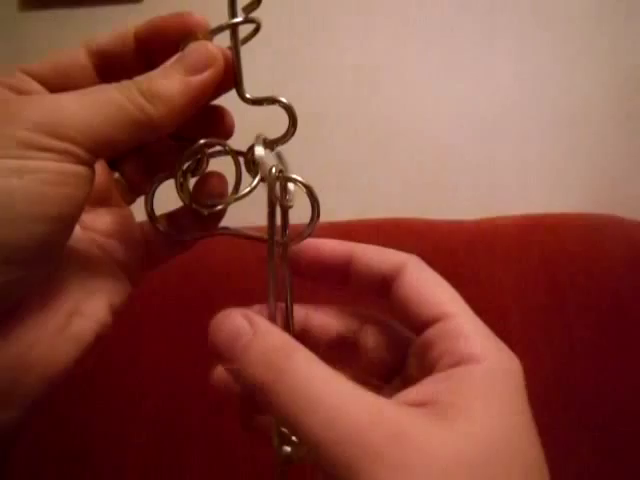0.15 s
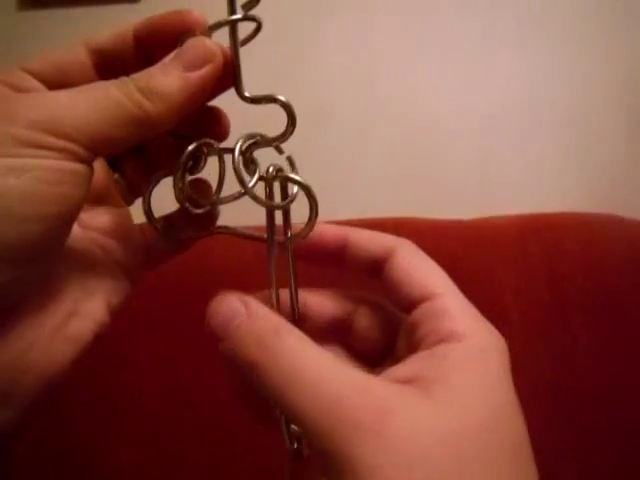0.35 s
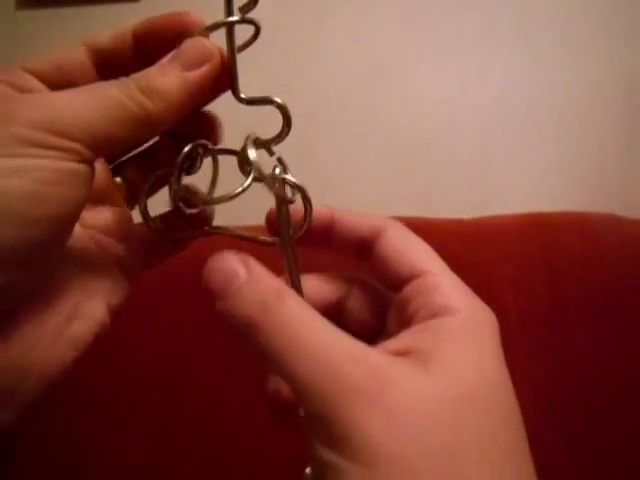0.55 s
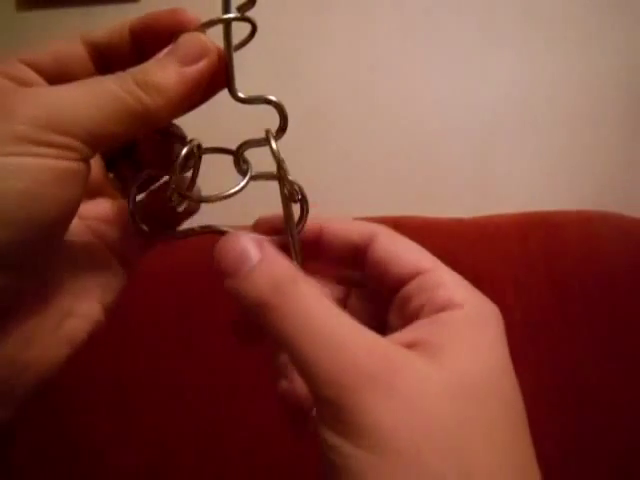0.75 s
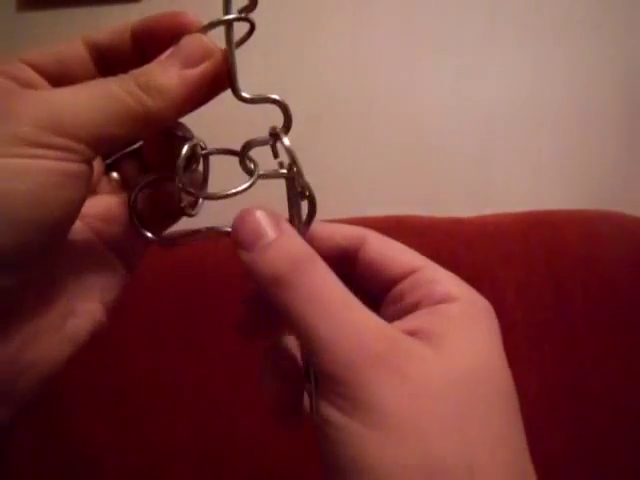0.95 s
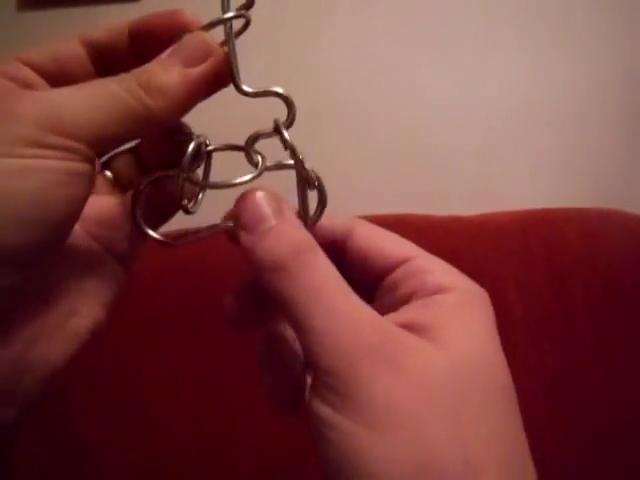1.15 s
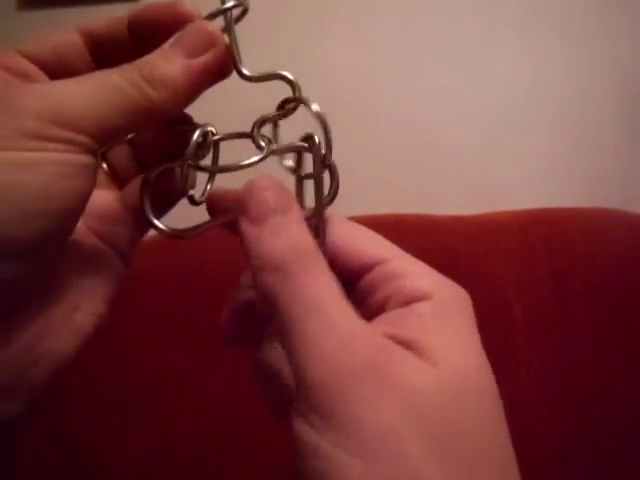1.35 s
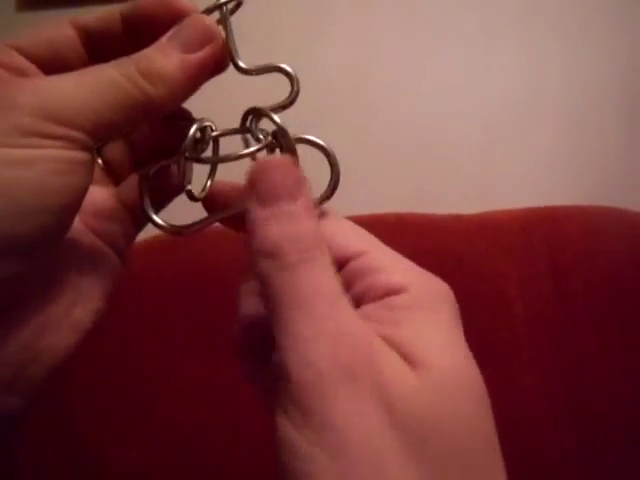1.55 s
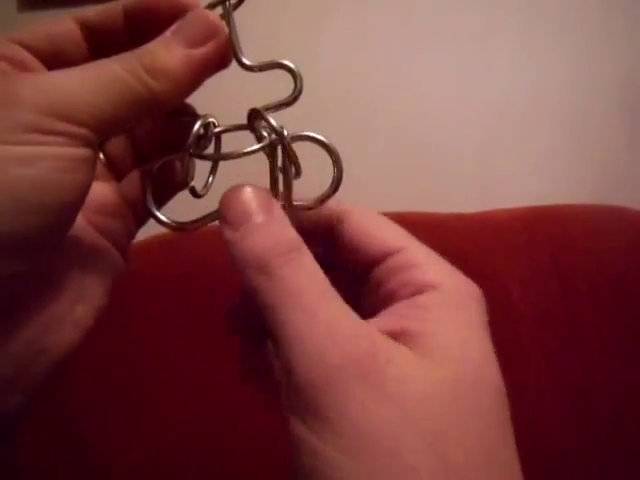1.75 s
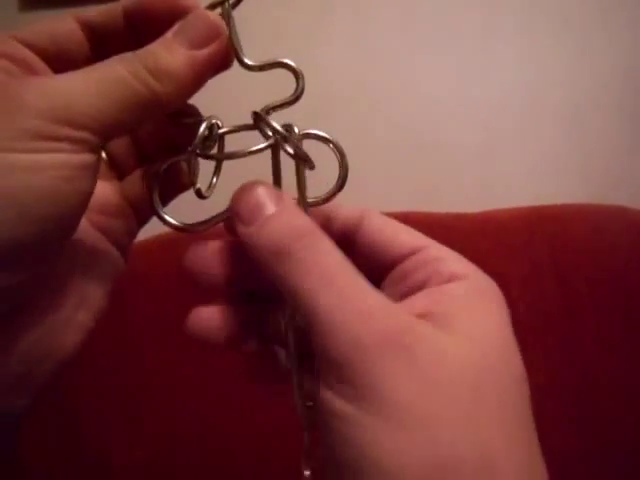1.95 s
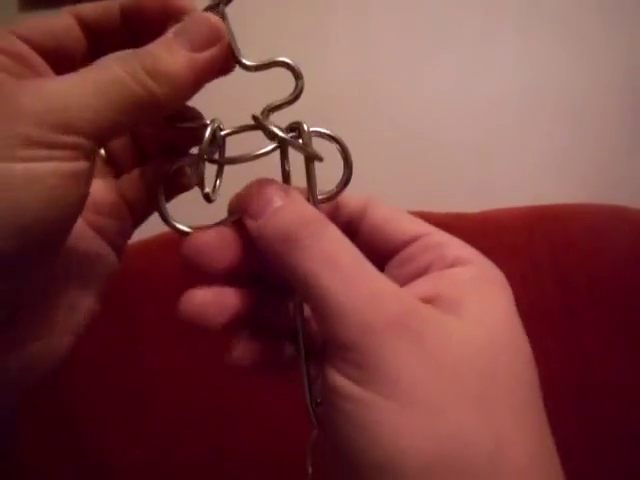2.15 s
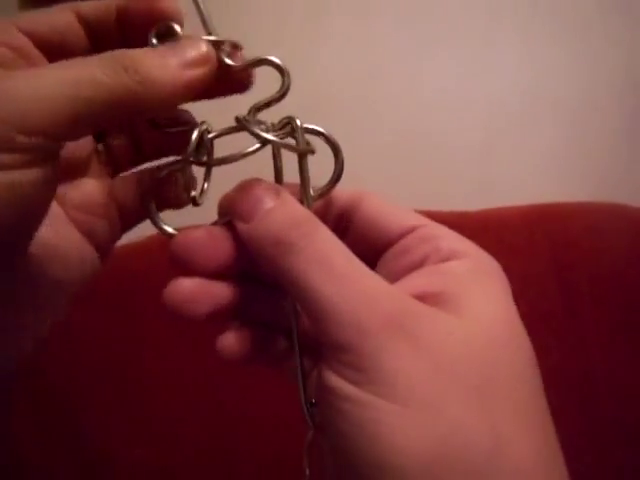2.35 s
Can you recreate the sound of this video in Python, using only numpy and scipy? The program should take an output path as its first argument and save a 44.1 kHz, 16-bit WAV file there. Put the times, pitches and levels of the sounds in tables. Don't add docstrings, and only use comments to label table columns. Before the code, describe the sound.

A small steel wire puzzle clinks and jingles close to the microphone. Light ticks begin around 0.1 seconds, brighter clinks follow at 0.2 and 0.4, and a dense loud rattle peaks around 0.75. Apart from one tick at 1.0, it rests until 1.35. A looser rattle peaks near 1.65, with scattered scrapy clicks around 2.0 and 2.2. Quiet room, faint short echo, fluctuating hiss.

```python
import sys
import numpy as np
from scipy import signal
from scipy.fft import rfft, irfft, next_fast_len
from scipy.io import wavfile
from scipy.ndimage import uniform_filter1d

SR = 44100
rng = np.random.default_rng(int(sys.argv[2]) if len(sys.argv) > 2 else 0)


def master_out(mix):
    frames = np.transpose(np.atleast_2d(mix))
    ceiling = np.clip(frames, -1, 1)
    pcm = np.round(ceiling * 32767).astype(np.int16)
    wavfile.write(sys.argv[1], SR, pcm)


def ratio_of_db(decibels):
    return 10 ** (np.asarray(decibels, float) / 20)


N = 105840

# f/Hz, left over right/dB
LEAN = [(3000, -2.34), (6000, 2.5), (9000, -2), (13000, -11.5)]
SIDE = np.array([[.5], [-.5]])


def unit(x):
    return x / np.sqrt(np.mean(x ** 2) + 1e-20)


def along(points, hz):
    f, v = np.transpose(points)
    return np.interp(np.log(hz + 1), np.log(f + 1), v)


def filtered(x, response):
    m = next_fast_len(x.shape[-1] + 4096)
    spectrum = rfft(x, m) * response(np.fft.rfftfreq(m, 1 / SR))
    return irfft(spectrum, m)[..., :x.shape[-1]]


def hiss():
    # t/s, hiss level/dB
    ride = [(0, -59.5), (.23, -56), (.4, -51), (.57, -49.5), (.74, -48.5), (0.841, -55.5), (1.3, -57),
            (1.44, -53.5), (1.62, -49.5), (1.96, -51.5), (2.4, -50)]
    # f/Hz, density/dB per Hz
    colour = [(20, -3.5), (180, -11), (400, -12), (750, -15.5), (2600, -20), (8000, -24.5), (14280, -25.5),
              (14420, -100)]
    # f/Hz, correlation
    alike = [(60, 0.66), (240, 0.332), (940, 0.234), (3700, 0.085), (14600, 0)]
    level_db = 5.5

    def mid_side(hz):
        angle = np.arccos(np.clip(along(alike, hz), -1, 1)) / 2
        return ratio_of_db(along(colour, hz)) * [np.cos(angle), np.sin(angle)]

    mid, side = filtered(rng.standard_normal((2, N)), mid_side)
    s, db = np.transpose(ride)
    ride_db = np.interp(np.arange(N) / SR, s, db)
    balance_db = np.array([[-.4], [.4]])
    return unit(np.array([mid + side, mid - side])) * ratio_of_db(level_db + ride_db + balance_db)


def room(x):
    # f/Hz, t60/s
    decay = [(2000, 0.3), (6000, 0.201), (13000, 0.169)]
    hz, t, z = signal.stft(rng.standard_normal((2, SR // 3)), SR, nperseg=256)
    z = z * ratio_of_db(-60 * t / along(decay, hz)[:, None])
    tail = signal.istft(z, SR, nperseg=256)[1]
    late = np.pad(x, ((0, 0), (200, 0)))
    return signal.fftconvolve(late, tail / np.linalg.norm(tail[0]), axes=1)[:, :N]


def ports(hz, chance):
    scatter_db, lag_scatter_rad = -0.5, 0.846
    lean_db = along(LEAN, hz) + scatter_db * chance[0]
    return ratio_of_db(SIDE * lean_db), SIDE * lag_scatter_rad * chance[1]


def singing():
    # t/s, level/dB, f/Hz, length before damping/s
    sings = [(0.098, -51.0, 9050.0, 0.025), (0.127, -51.0, 9860.0, 0.012), (0.185, -39.0, 6020.0, 0.012),
             (0.182, -37.0, 11290.0, 0.016), (0.235, -44.0, 9890.0, 0.012), (0.4015, -31.0, 9010.0, 0.045),
             (0.4015, -36.0, 13100.0, 0.015), (0.4575, -28.0, 9020.0, 0.068), (0.458, -42.0, 5220.0, 0.008),
             (0.481, -36.0, 13080.0, 0.03), (0.483, -44.0, 10530.0, 0.04), (0.483, -42.0, 11290.0, 0.055),
             (0.595, -41.0, 10540.0, 0.012), (0.64, -32.0, 4870.0, 0.02), (0.64, -35.0, 6500.0, 0.025),
             (0.645, -24.0, 11290.0, 0.018), (0.701, -26.0, 10500.0, 0.048), (0.701, -24.0, 11270.0, 0.035),
             (0.701, -26.0, 12410.0, 0.026), (0.706, -44.0, 2190.0, 0.012), (0.735, -26.0, 13050.0, 0.04),
             (0.752, -31.0, 9060.0, 0.015), (1.003, -43.0, 13630.0, 0.01), (1.41, -44.0, 10510.0, 0.05),
             (1.415, -46.0, 12410.0, 0.043), (1.428, -45.0, 8660.0, 0.022), (1.5, -56.0, 11260.0, 0.02),
             (1.589, -42.0, 9010.0, 0.025), (1.614, -36.0, 9030.0, 0.028), (2.045, -47.0, 13140.0, 0.006),
             (0.2, -42, 9800, 0.012), (0.2, -37, 11290, 0.014), (0.227, -37, 11300, 0.008),
             (0.227, -39, 13900, 0.005), (0.2905, -38, 12500, 0.005), (0.2905, -40, 9900, 0.005),
             (0.291, -47, 5000, 0.004), (0.312, -54, 9050, 0.014), (0.402, -40, 10520, 0.015),
             (0.483, -41, 13600, 0.03), (0.645, -39, 7700, 0.018), (0.701, -38, 6590, 0.04),
             (0.703, -41, 7630, 0.08), (0.701, -51, 3770, 0.04), (0.766, -36, 6560, 0.025),
             (0.768, -39, 5260, 0.018), (0.82, -47, 11280, 0.02), (0.81, -53, 13600, 0.035),
             (1.97, -40, 11300, 0.015), (2.028, -49, 9900, 0.01)]
    free_t60_s, damped_t60_s, rise_s = .25, .03, 0.000206
    beat_hz, beat_depth, level_db = 90, .35, 1.5
    out = np.zeros((2, N + SR))
    t = np.arange(SR // 5) / SR
    for s, db, hz, length in sings:
        chance = rng.standard_normal((4, 1))
        gain, lag = ports(hz, 0.38 * chance)
        fall_db = -60 * (t / free_t60_s + np.maximum(t - length, 0) / damped_t60_s)
        beat_phase = 2 * np.pi * beat_hz * (1 + 0.155 * chance[2]) * t + 3 * chance[3]
        beat = 1 + beat_depth * np.sin(beat_phase)
        tone = np.sin(2 * np.pi * hz * t + lag) * (1 - np.exp(-t / rise_s))
        start = round(s * SR)
        out[:, start:start + len(t)] += gain * ratio_of_db(db + level_db + fall_db) * beat * tone
    return out[:, :N]


def strike(modes, t60, extra_db, t):
    detune, mode_scatter_db = .002, 3
    hz, db = np.transpose(modes)
    chance = rng.standard_normal((4, len(hz)))
    gain, lag = ports(hz, chance)
    pitch = hz * (1 + detune * chance[3])
    swing = np.sin(2 * np.pi * pitch[:, None] * t + lag[..., None])
    size = gain * ratio_of_db(db + extra_db + mode_scatter_db * chance[2])
    rise = 1 - np.exp(-t * SR / 4)
    return (size[..., None] * swing).sum(1) * ratio_of_db(-60 * t / t60) * rise


def touches(length, samples):
    per_s, chatter_db, scatter_db, fade_db = 2200, -10, 3, -4
    gap, size = rng.exponential(size=(2, 120))
    when = (np.cumsum(gap) - gap[0]) / per_s
    force = ratio_of_db(chatter_db + scatter_db * np.minimum(size, 2) + fade_db * when / length)
    force *= np.clip((length - when) * per_s, 0, 1)
    force[0] = 1
    push = force * np.sign(rng.standard_normal(120))
    return np.bincount(np.minimum(when * SR, samples - 1).astype(int), push, samples)


def knocks():
    # t/s, peak level/dB, low modes over high/dB, chatter length/s,
    # ringing over crack/dB (low = held in the fingers)
    shake_a = [(0.081, -40, -16.5, 0.03, -1), (0.0986, -33, -18.5, 0.0061, -1.5),
               (0.118, -39, -13.5, 0.0076, 3.5), (0.15, -41.5, -13.5, 0.041, -7),
               (0.1817, -19, -12, 0.00176, -4.5), (.185, -28, -15, 0.0244, 0),
               (0.202, -23.5, -16, 0.0111, 1.5), (0.2264, -19, -17.5, 0.00617, 1),
               (0.261, -40, -10.5, 0.023, 0), (0.2901, -23, -19.5, 0.0028, 3.5),
               (0.303, -35, -9, 0.0145, 1), (0.401, -14, -24, 0.0066, -0.5),
               (0.413, -31.5, -17.5, 0.0142, -1), (0.4304, -23, -20, 0.006, -1.5),
               (.438, -29, -13.5, .015, -1), (0.458, -15.5, -22.5, 0.0041, -1),
               (0.468, -33.5, -26, 0.0132, 0), (0.483, -22, -19, 0.0173, 1.5),
               (0.5917, -26.5, -13, 0.0083, -2.5), (0.6394, -15.5, -7.5, 0.0114, 7),
               (0.649, -15, -15, 0.0135, 2), (0.666, -26, -8.5, 0.0277, -5),
               (0.6931, -13.5, -13.5, 0.00586, -0.5), (0.7029, -16.5, -10, 0.0118, 4.5),
               (0.7061, -21, -11, 0.019, 3.5), (0.7225, -16.5, -10.5, 0.0056, 6),
               (0.73, -17.5, -11.5, 0.0094, 2), (0.741, -18.5, -11.5, 0.016, 5),
               (0.7536, -17, -17, 0.0065, 5), (0.76, -12, -13.5, 0.0086, 4), (0.7665, -8.5, -21, 0.0038, 7),
               (0.769, -14.5, -10, 0.0088, 6), (0.7754, -9, -15, 0.006, 2.5),
               (0.78, -13, -18.5, 0.007, 3.5), (0.79, -23, -9.5, 0.016, -8), (0.804, -47.5, -16, 0.027, -2),
               (1.002, -27, -18.5, 0.00397, -4)]
    shake_b = [(1.354, -34, -11, 0.0042, -4.5), (1.365, -30, -12, 0.0053, -2.5),
               (1.405, -33.5, -11, 0.016, 4), (1.417, -31.5, -11.5, 0.0453, 0.5), (1.501, -39, -8, 0.02, 1),
               (1.523, -17, -13.5, 0.00645, 0), (1.53, -27.5, -7, 0.0078, 0),
               (1.542, -30.5, -10, 0.017, -7), (1.56, -28.5, -13.5, 0.005, -4.5),
               (1.567, -35.5, -8.5, 0.022, -5), (1.5885, -27, -12, 0.032, -2.5),
               (1.6166, -21.5, -13, 0.0062, -8), (1.635, -24.5, -9, 0.006, 2),
               (1.6432, -11, -14.5, 0.0101, -5.5), (1.651, -12.5, -15, 0.0038, 5),
               (1.669, -36, -14, 0.0218, -4.5), (1.71, -37.5, -12.5, 0.0292, -5.5),
               (1.7446, -39.5, -11.5, 0.0025, -2), (1.962, -23, -10.5, 0.0093, -4),
               (1.969, -23.5, -8.5, 0.0157, -3.5), (1.984, -29, -9, 0.0084, -5),
               (2.0249, -33, -9, 0.0092, -6), (2.044, -36, -7, 0.0058, -2.5),
               (2.2072, -19, -11, 0.0188, -8), (2.236, -27.5, -8, 0.0044, -6.5),
               (2.239, -32, -9, 0.0134, -8)]
    # f/Hz, level/dB
    rings = [(8670, -8), (9070, -8), (9560, -4), (9860, -4), (10500, -2), (10700, -4), (11280, -1),
             (11500, -4), (11800, -5), (12100, -4), (12430, -3), (13050, -4), (13600, -4), (14000, -6)]
    # f/Hz, level/dB
    frame = [(3260, -22), (3760, -14), (4110, -19), (4570, -12), (4860, -9), (5280, -7), (5750, -8),
             (6100, -6), (6410, -6), (6580, -3), (7040, -10), (7630, -3)]
    # f/Hz, density/dB per Hz
    crack_colour = [(1500, -44.5), (4300, -16.5), (4700, -13), (7800, -5), (8250, -30.5), (8800, 3.5),
                    (11700, 2), (14500, -8.5)]
    rings_t60_s, rings_db, frame_t60_s, frame_db = .035, -3.5, .03, 7.5
    split_hz, usual_low_db = 8200, -15
    thud_hz, thud_per_db = 4400, .8
    scrape_db, scrape_t60_s, click_db, click_t60_s, crack_rise_s = 5.5, .012, 10, .003, .00015
    level_db = -3
    out = np.zeros((2, N + SR))
    t = np.arange(SR // 10) / SR
    for s, db, low_db, length, ring_db in shake_a + shake_b:
        train = touches(length, len(t))

        def crack_response(hz):
            tilt_db = (low_db - usual_low_db) * (hz < split_hz)
            thud_db = -thud_per_db * ring_db * (hz < thud_hz)
            return ratio_of_db(along(crack_colour, hz) + tilt_db + thud_db + SIDE * along(LEAN, hz))

        grit = rng.standard_normal((2, len(t)))
        both_ports = grit[0] + .5 * grit[1] * [[1], [-1]]
        crack = unit(filtered(both_ports, crack_response)) * (1 - np.exp(-t / crack_rise_s))

        body = strike(rings, rings_t60_s, ring_db + rings_db, t)
        body = body + strike(frame, frame_t60_s, low_db + ring_db + frame_db, t)
        sound = signal.fftconvolve(body, train[None], axes=1)

        fall = ratio_of_db(2 * (scrape_db - 60 * t / scrape_t60_s))
        scrape = np.sqrt(np.abs(signal.fftconvolve(train ** 2, fall)[:len(t)]))
        click = ratio_of_db(click_db - 60 * t / click_t60_s)
        sound[:, :len(t)] += crack * (scrape + click)

        loudest = np.sqrt(uniform_filter1d(sound ** 2, size=90).max())
        start = round(s * SR)
        out[:, start:start + sound.shape[1]] += ratio_of_db(db + level_db) * sound / loudest
    return out[:, :N]


def scene():
    metal = knocks() + singing()
    room_db = -14
    return metal + ratio_of_db(room_db) * room(metal) + hiss()


def roll_off(x):
    return signal.sosfilt(signal.butter(12, 15200, fs=SR, output="sos"), x)


def record(dry):
    top_hz, edge_hz, leak_db = 14330, 50, -50

    def band_limit(hz):
        slope = 1 / (1 + np.exp(np.clip((hz - top_hz) / edge_hz, -50, 50)))
        return slope + ratio_of_db(leak_db) * (hz > top_hz)

    return roll_off(filtered(dry, band_limit))


dry = scene()
out = record(dry)
master_out(out)
```